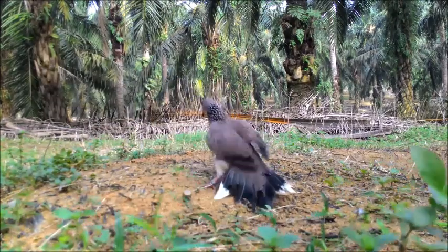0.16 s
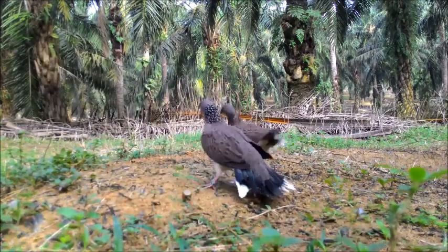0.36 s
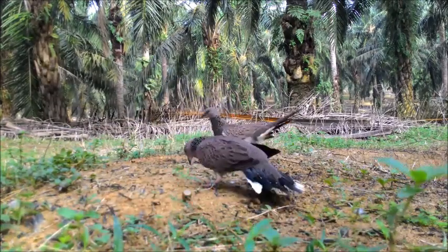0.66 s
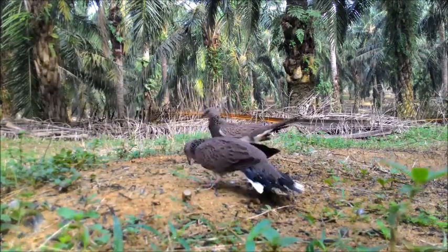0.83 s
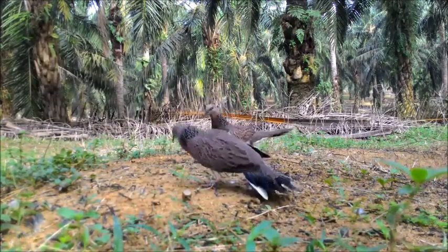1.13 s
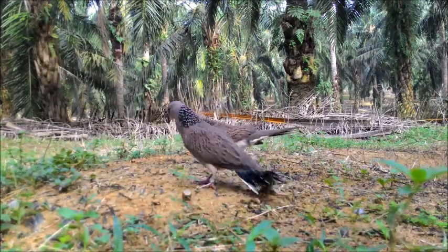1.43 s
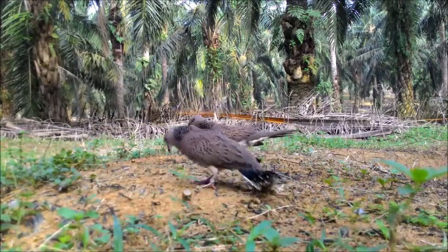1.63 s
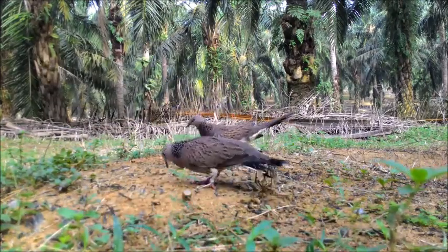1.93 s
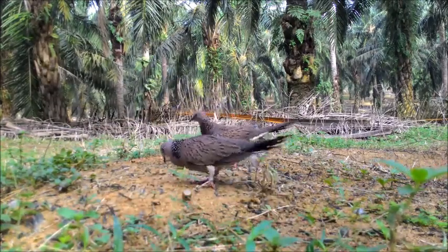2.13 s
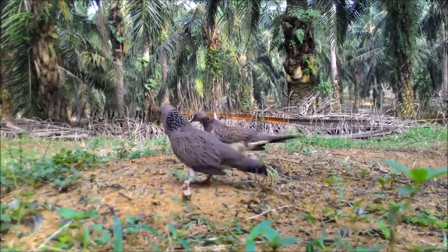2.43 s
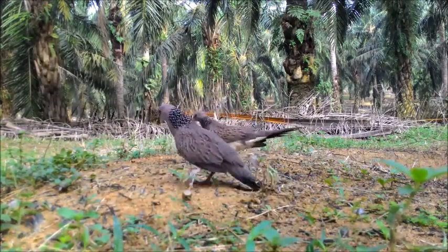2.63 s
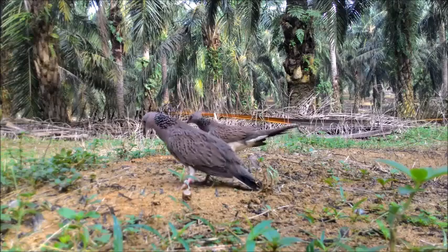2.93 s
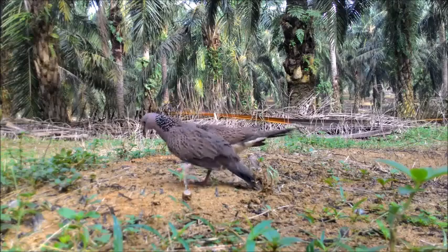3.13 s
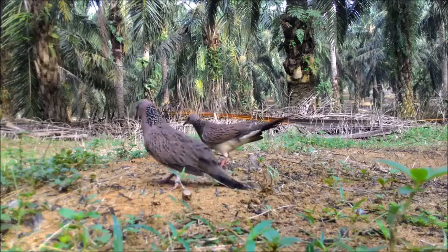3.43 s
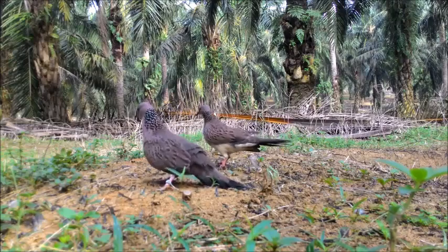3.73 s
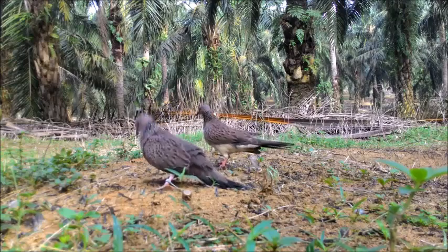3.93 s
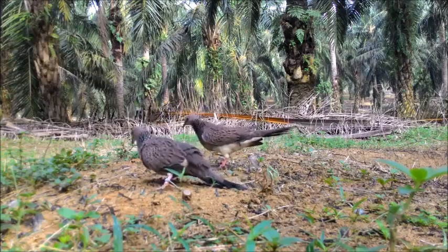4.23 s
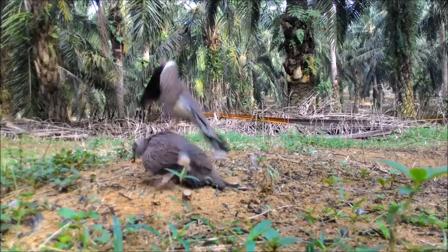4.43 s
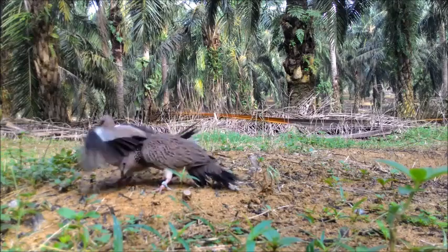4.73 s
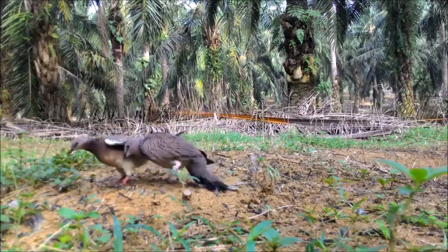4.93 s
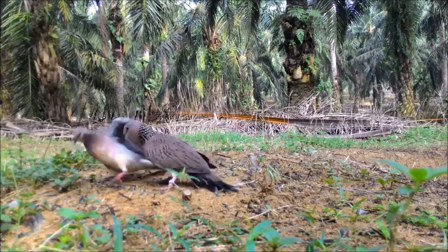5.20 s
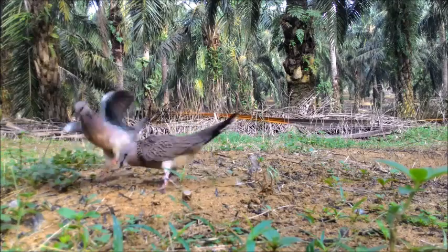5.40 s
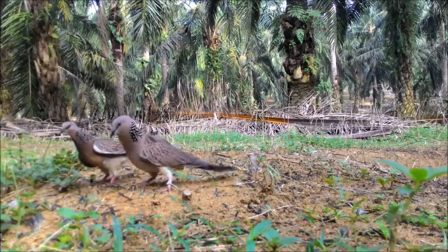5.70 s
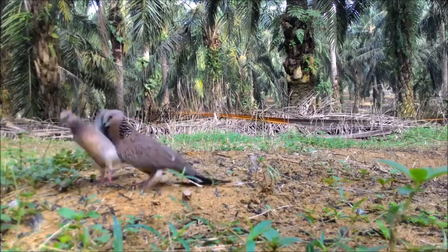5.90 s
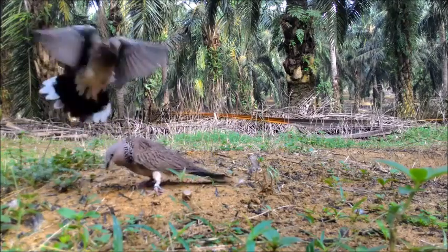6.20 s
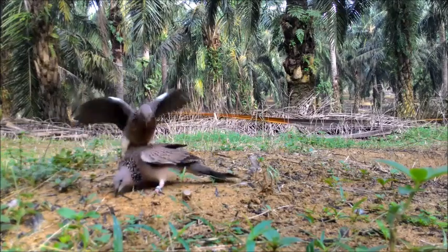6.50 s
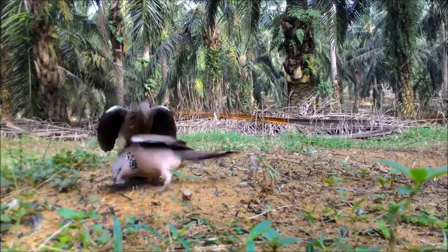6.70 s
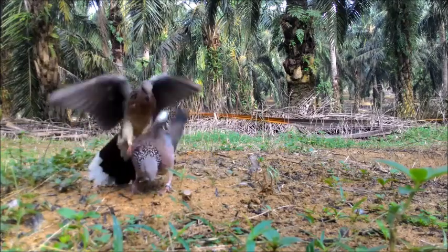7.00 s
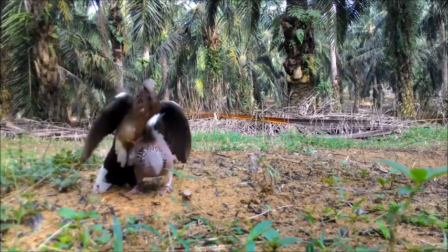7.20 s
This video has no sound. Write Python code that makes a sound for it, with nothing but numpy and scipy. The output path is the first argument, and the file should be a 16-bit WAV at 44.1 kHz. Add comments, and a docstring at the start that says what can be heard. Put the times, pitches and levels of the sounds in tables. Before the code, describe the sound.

Two doves fight on bare soil in a palm grove, very near a stereo microphone. Quick wing claps, rustling feathers and low puffs of air on the microphone open it, then two pairs of rough throbbing coos. A faint distant engine and soft bird pips fill the lull before lighter flaps, one violent double clap, a far rasping bird and scattered last slaps. A high cricket chorus pulses throughout.

```python
"""Two doves fight on bare soil in a palm grove, close to a two-port microphone; trunks return a short, dull echo.
First come wing claps, feather rustle and gusts of wing air on the membranes, then two pairs of throbbing coos.
A far engine follows, with soft bird pips; later a far bird rasps and more claps break out, one pair very loud.
Throughout, a cricket chorus pulses, louder at the start, over a lumpy breeze and capsule hiss.
Voices are beating sines, wings and air are shaped noise, motors and crickets are wavering tones."""
import sys
import numpy as np
from scipy import signal
from scipy.fft import rfft, irfft
from scipy.io import wavfile
from scipy.ndimage import uniform_filter1d

SR = 44100
rng = np.random.default_rng(int(sys.argv[2]) if len(sys.argv) > 2 else 0)


def wav_record(signal):
    """Record a signal, one row per channel, as 16-bit PCM in the file named by sys.argv[1]."""
    frames = np.transpose(np.atleast_2d(signal))
    bounded = np.clip(frames, -1, 1)
    # unit amplitude maps onto the largest positive 16-bit level
    quanta = np.round(bounded * 32767).astype(np.int16)
    wavfile.write(sys.argv[1], SR, quanta)


N = 324135
TIME = np.arange(N) / SR  # s


def amp(db):
    """Decibels to gain."""
    return 10 ** (np.asarray(db) / 20)


def unit(x):
    """Scaled to rms 1."""
    return x / np.sqrt(np.mean(x ** 2) + 1e-20)


def columns(rows):
    """Table columns drawn as curves over time, and a gate open along the table with soft ends."""
    s, *values = np.transpose(rows)
    gate = np.clip(np.minimum(TIME - s[0] + .004, s[-1] + .004 - TIME) / .012, 0, 1)
    return [np.interp(TIME, s, v) for v in values] + [gate]


def at_hz(points):
    """A spectrum of (f/Hz, level/dB) points as gain on the FFT grid."""
    hz, db = np.transpose(points)
    grid_hz = np.arange(N // 2 + 1) * SR / N
    return amp(np.interp(np.log(grid_hz + 1), np.log(hz), db))


def noise(points):
    """Noise of a given colour, rms 1."""
    white = rng.standard_normal(N)
    return unit(irfft(rfft(white) * at_hz(points), N))


def drift(rate_hz):
    """Slow random wander of spread 1."""
    return noise([(rate_hz, 0), (rate_hz * 10, -40), (rate_hz * 100, -120)])


def phase_of(hz):
    """Running phase in radians of a tone whose frequency may move."""
    return 2 * np.pi * np.cumsum(hz) / SR


def resonate(x, modes):
    """Parallel resonances (f/Hz, width/Hz, level/dB) of alternating sign."""
    out = 0
    for k, (hz, width_hz, db) in enumerate(modes):
        r = np.exp(-np.pi * width_hz / SR)
        poles = [1, -2 * r * np.cos(2 * np.pi * hz / SR), r * r]
        ringing = signal.lfilter([1 - r, 0, r - 1], poles, x + 1e-18)
        out = out + (-1) ** k * amp(db) * ringing
    return out


def bump(centre, half):
    """A bell-shaped swell; both arguments in seconds."""
    return np.exp(-.5 * ((TIME - centre) / half) ** 2)


# Dove voice close by, one table a note: [t/s, f/Hz, level/dB, roughness clipped to 0-1]
COO_NOTES = [
    [(.598, 408.6, -44.5, .8), (.612, 485.6, -32, .8), (.64, 667, -22, 0.9), (.68, 657, -21, 0.9),
     (.7, 613.3, -24.5, 0.7), (.72, 520.8, -28, .6), (.74, 462.7, -33, .7), (.754, 407.4, -53, .7)],
    [(.872, 547.7, -30.5, .9), (.885, 561.2, -28.5, 0.8), (.915, 678, -22.5, 1), (.935, 591, -22, .8),
     (.99, 635.8, -21.5, 0.8), (1.025, 566.4, -23.5, .6), (1.05, 658.7, -20, .5), (1.1, 634.6, -21, 0.3),
     (1.13, 608.3, -22.5, .05), (1.25, 569.8, -26, 0.3), (1.287, 385.3, -40.5, .4)],
    [(1.74, 432.9, -39.5, 1.1), (1.77, 586.7, -23, .9), (1.79, 669.4, -20, .8), (1.815, 630, -20, 0.9),
     (1.835, 542.7, -25.5, 0.6), (1.86, 522.4, -26.5, 0.7), (1.885, 483.6, -33.5, 0.2),
     (1.902, 393, -42, .5)],
    [(2.008, 488, -35.5, .7), (2.045, 637, -23, 0.9), (2.1, 686.5, -19.5, 0.6), (2.125, 633.7, -21.5, .9),
     (2.14, 586, -21.5, 0.1), (2.2, 645, -20.5, .25), (2.25, 632, -22, .05), (2.32, 600.7, -23, 0.1),
     (2.375, 542.2, -27.5, 0.3), (2.4, 443.8, -38.5, 0.4)],
]
# What else differs between notes: [beat gap as share of pitch, slower beat when rough/dB,
# third harmonic peak t/s, its level/dB, its half width/s]
COO_TRAITS = [(0.18, -12.5, .665, -68, .025), (.195, -10, .93, -69, 0.065), (0.18, -13.5, 1.79, -91, 0.035),
              (0.18, -5.5, 2.23, -81.5, .07)]
# Passband of the inflated neck: [f/Hz, level/dB]
NECK_COLOUR = [(250, -14.5), (380, -3.5), (880, 5.5), (1020, -7.5), (1180, -25.5), (1300, -41.5),
               (1500, -55)]
# Air noise in the neck: [f/Hz, relative level/dB per Hz]
BREATH_COLOUR = [(300, -25.5), (600, -5.5), (800, 0.5), (1120, -3), (1250, -32.5), (1800, -53.5)]
LADDER_DB, MIRROR_DB, OCTAVE_DB = -12, -8, -12.5  # step of upper side lines, lower side line, second harmonic
FAST_SMOOTH_DB, FAST_ROUGH_DB, SLOW_SMOOTH_DB = -23.5, -5.5, -22.5  # side lines of the two beats
SLOW_BEAT_SHARE = 0.58  # the slower beat rate, as share of the gap
BREATH_ROUGH = .09  # breath added at full roughness
BREATH_PER_DB, FULL_VOICE_DB = 0.0264, -24  # breath also grows as the voice weakens below this level
AIR_DB = -11  # gain of the air noise on the breath
SWING_LIMIT = .65  # how far the membrane flattens loud beats, 0-1


def coos():
    """A near-sine voice; a second membrane adds ladders of side lines, so the level throbs at two rates."""
    rows = [(*row, row[1] * traits[0], traits[1])
            for note, traits in zip(COO_NOTES, COO_TRAITS) for row in note]
    pitch, level_db, rough, gap, slow_rough_db, _ = columns(rows)
    rough = np.clip(rough, 0, 1)
    weakness_db = np.clip(FULL_VOICE_DB - level_db, 0, 20)
    breath = BREATH_ROUGH * rough + BREATH_PER_DB * weakness_db

    beat = 1 + breath * (drift(80) + 1j * drift(90))
    rates = ((gap, FAST_SMOOTH_DB, FAST_ROUGH_DB),
             (SLOW_BEAT_SHARE * gap, SLOW_SMOOTH_DB, slow_rough_db))
    for hz, smooth_db, rough_db in rates:
        turn = np.exp(1j * phase_of(hz * (1 + .05 * drift(30))))
        side_db = smooth_db + rough * (rough_db - smooth_db)
        upper = turn / (1 - amp(LADDER_DB) * turn)  # an endless ladder of lines
        beat = beat + amp(side_db) * (upper + amp(MIRROR_DB) / turn)
    beat = beat / (1 + np.abs(beat) ** 2) ** (.5 * SWING_LIMIT)  # the swing saturates
    beat = beat / np.sqrt(uniform_filter1d(np.abs(beat) ** 2, size=1000) / 2)  # even level

    air = amp(AIR_DB) * (breath + 0.025) * noise(BREATH_COLOUR) * np.abs(beat)
    shaky = np.exp(.8j * drift(60))  # the third harmonic is unsteady
    gate = sum(columns(note)[-1] for note in COO_NOTES)
    third_gain = sum(amp(db) * bump(s, half) for *_, s, db, half in COO_TRAITS)
    carrier = np.exp(1j * phase_of(pitch))
    voiced = np.real(beat * carrier + amp(OCTAVE_DB) * beat ** 2 * carrier ** 2)
    low = gate * amp(level_db) * voiced
    third = third_gain * np.real(beat * shaky * carrier ** 3)
    return irfft(rfft(low) * at_hz(NECK_COLOUR), N) + gate * (third + amp(level_db) * air)


# Wing claps close by, before a shared 0.5 dB lift:
# [t/s, thud level/dB, thud f/Hz, quill snap level/dB, length/s]
WING_CLAPS = [(.013, -30.5, 1050, -30, 0.006), (0.04, -24, 530, -35.5, 0.016),
              (0.092, -24, 810, -27.5, 0.0085), (0.121, -22, 971.6, -38, 0.0083),
              (4.546, -51.5, 594, -49, 0.0093), (4.569, -41.5, 492.7, -55, 0.0034),
              (5.4151, -11, 800, -21.5, 0.005), (5.4208, -24.5, 990, -14, 0.0014),
              (6.099, -45, 840, -60, 0.016), (6.119, -26.5, 823, -47.5, 0.0048),
              (6.123, -28, 610, -39.5, 0.0076), (6.41, -60, 650, -73, 0.029),
              (6.571, -54.5, 622, -64, .005), (7.094, -39, 903, -44.5, 0.0062),
              (7.104, -26.5, 1620, -31.5, 0.0062), (7.108, -35.5, 522, -50, 0.013)]
# Lone quill ticks, before the same lift: [t/s, level/dB]
QUILL_TICKS = [(.008, -23), (.018, -31), (.137, -30.5), (.335, -38), (.437, -56), (0.454, -52),
               (4.528, -57.5), (4.614, -49)]
# Push of air under every thud: [f/Hz, width/Hz, level/dB]
AIR_PUSH = [(170, 260, -3)]
# Quill resonances: [f/Hz, width/Hz, level/dB]
QUILLS = [(1690, 600, -12.5), (4740, 2200, -6), (7360, 1200, -2), (10800, 1700, -19.5)]
TICK_S, TICK_THUD_DB, TICK_HZ = 0.0016, -19.5, 1023  # length, thud against tick, thud pitch
THUD_CUT = 1.8  # soft vanes cut the thud above this multiple of its pitch


def claps():
    """Each clap is a brief burst of air noise in the hollow between the wings and in the quill resonances."""
    out = np.zeros(N)
    age = np.arange(-600, 1400) / SR
    ticks = [(s, db + TICK_THUD_DB, TICK_HZ, db, TICK_S) for s, db in QUILL_TICKS]
    for s, thud_db, hz, snap_db, length in WING_CLAPS + ticks:
        envelope = np.exp(-.5 * (age / length * 2.0) ** 2)
        burst = envelope * rng.choice([-1, 1], (2, len(age)))
        thud = resonate(burst[0], AIR_PUSH + [(hz, hz * 0.39, 0)])
        thud = signal.lfilter(*signal.butter(2, THUD_CUT * hz, fs=SR), thud)
        snap = resonate(np.convolve(burst[1], [1, 2, 1], "same"), QUILLS)
        clap = amp(thud_db) * thud / np.max(np.abs(thud))
        clap = clap + amp(snap_db) * snap / np.max(np.abs(snap))
        at = round(s * SR) - 600 + np.arange(len(age))
        out[at[at >= 0]] += amp(0.5) * clap[at >= 0]
    return out


# Wing strokes close by, at their fastest: [t/s, swish level/dB, rustle level/dB]
WING_STROKES = [(.01, -66, -47.5), (0.041, -29.5, -40), (.075, -41, -45.5), (.125, -52.5, -51),
                (4.53, -64, -62), (4.552, -51, -54.5), (4.62, -70, -76), (5.401, -44.5, -61),
                (5.429, -50.5, -48.5), (5.48, -67, -57), (5.6, -55.5, -60.5), (6.095, -59.5, -67),
                (6.131, -44.5, -52.5), (6.41, -58.5, -71), (6.569, -64.5, -77), (7.09, -65.5, -65.5),
                (7.116, -47.5, -48.5), (7.34, -67, -85)]
# Dull brush of the vanes: [f/Hz, relative level/dB per Hz]
VANE_SWISH = [(120, 16), (250, 9), (700, 3), (1200, 0.5), (1800, -53.5)]
# Grainy feather rustle: [f/Hz, relative level/dB per Hz]
VANE_RUSTLE = [(1200, -8.5), (1700, -8), (2500, -13), (3500, -8), (5000, -6), (8500, -15), (11000, -22.5),
               (15500, -39.5)]
STROKE_RISE_DB_PER_S, STROKE_FALL_DB_PER_S = 600, 400
TAIL_DB, TAIL_DB_PER_S = -8, 97  # the grove's echo trails slowly after each stroke


def feathers():
    """Vanes brushing: a dull swish and a grainy rustle swell with each stroke, drop, and trail off in the
    grove's echo."""
    swish = noise(VANE_SWISH) * amp(3 * drift(60))
    rustle = noise(VANE_RUSTLE) * amp(3 * drift(150))
    swish_power, rustle_power = np.zeros((2, N))
    for s, swish_db, rustle_db in WING_STROKES:
        near = slice(max(0, round((s - .2) * SR)), round((s + .6) * SR))
        age = TIME[near] - s
        tail_db = TAIL_DB - TAIL_DB_PER_S * age
        fall_db = np.maximum(-STROKE_FALL_DB_PER_S * age, tail_db)
        stroke_power = amp(np.minimum(STROKE_RISE_DB_PER_S * age, fall_db)) ** 2
        swish_power[near] += amp(swish_db) ** 2 * stroke_power
        rustle_power[near] += amp(rustle_db) ** 2 * stroke_power
    return np.sqrt(swish_power) * swish + np.sqrt(rustle_power) * rustle


# Puffs of wing air at the microphone: [t/s, peak level/dB before softening, f/Hz]
WING_PUFFS = [(.042, -24, 61.4), (.09, -30, 76), (.133, -33.5, 44), (.225, -37, 51.4), (.281, -40, 70.5),
              (.365, -10, 145.8), (.375, -10.5, 101), (.391, -22, 96.6), (.413, -8.5, 115),
              (.438, -13, 115.7), (.453, -23.5, 171), (.465, -18.5, 101.2), (.58, -33, 71.3),
              (.809, -47.5, 40), (.9, -38, 54)]
# Breeze at the microphone: [t/s, level/dB before a 1.5 dB cut and the lumps]
BREEZE = [(0.0, -52.5), (0.49, -43.5), (0.63, -54), (1.7, -67), (2.9, -57.5), (3.66, -54.5), (4.05, -63.5),
          (4.54, -51), (5.2, -64), (5.49, -55.5), (6.1, -71), (6.3, -56.5), (7.35, -49.5)]
# Its rumble: [f/Hz, relative level/dB per Hz]
BREEZE_COLOUR = [(15, -13.5), (35, 1.5), (60, 13), (110, 4), (200, -43.5)]
PUFF_CYCLES = 6.5  # each puff dies away by 60 dB within so many cycles
EDDY_SHARE, STRONG_PUFF_DB = 0.34, -15.5  # eddies on a strong puff; weaker puffs carry fewer


def gusts():
    """Wing air pushes the membrane in soft lumps, each with its eddies, over a lumpy breeze."""
    out = np.zeros(N)
    age = np.arange(6000) / SR
    eddies = noise([(100, -8.0), (250, -2), (500, -24.5), (800, -38)])
    for k, (s, db, hz) in enumerate(WING_PUFFS):
        start = round(s * SR)
        at = slice(start, start + len(age))
        shape = amp(-60 * age * hz / PUFF_CYCLES) * (1 - np.exp(-(age / 0.0063) ** 2))
        eddy_gain = EDDY_SHARE * amp(min(db - STRONG_PUFF_DB, 0) / 2)
        lump = np.sin(2 * np.pi * hz * age) + eddy_gain * eddies[at]
        out[at] += (-1) ** k * amp(db) * lump * shape / np.max(shape)
    soft = signal.sosfilt(signal.butter(4, 550, fs=SR, output="sos"), out)
    breeze_db = columns(BREEZE)[0] - 1.5 + 2.0 * drift(13.0)
    return soft + amp(breeze_db) * noise(BREEZE_COLOUR)


ECHO_T60_S, ECHO_CUT_HZ = 0.6, 1300


def trunks(x):
    """Scattered echoes from the trees: a dull, dying noise response."""
    age = np.arange(SR // 2) / SR
    onset = np.clip(age / 0.033, 0, 1)
    tail = rng.standard_normal(len(age)) * amp(-60 * age / ECHO_T60_S) * onset
    tail = signal.lfilter(*signal.butter(1, ECHO_CUT_HZ, fs=SR), tail)
    return signal.fftconvolve(x, tail / np.sqrt(np.sum(tail ** 2)))[:N]


# Wing strokes in one chirp of the nearest cricket: [t/s, level/dB]
CHIRP_STROKES = [(.011, -22), (.0257, -5), (.0403, 0), (.055, 0)]
# How early its chirps run: [t/s, lead/s]
CHIRP_LEAD = [(.25, 0), (1.75, .004), (3.25, .012), (4.25, .0065), (5.75, .003)]
# Its wing tones: [f/Hz, waver/Hz, rms level/dB once the chorus has settled, blur 0-1]
WING_TONES = [(6790, 65, -58, 0), (13500, 300, -86.5, 0.5)]
CHIRP_S, STROKE_HALF_S = 1 / 17.05, .0026  # chirp period, stroke half width


def cricket():
    """Uneven strokes, the first faint, make a chirp on a wavering wing tone; distance blurs the overtone."""
    age = (TIME + columns(CHIRP_LEAD)[0]) % CHIRP_S
    strokes = 0
    for s, db in CHIRP_STROKES:
        offset = (age - s + CHIRP_S / 2) % CHIRP_S - CHIRP_S / 2  # wraps round the chirp
        strokes = strokes + amp(db) * np.exp(-.5 * (offset / STROKE_HALF_S) ** 2)
    strokes = strokes * amp(1.5 * drift(25))
    out = 0
    for hz, waver_hz, db, blur in WING_TONES:
        tone = np.sin(phase_of(hz + waver_hz * drift(120)))
        out = out + amp(db) * unit((strokes + blur) * tone)
    return out


# Chorus and air of the grove all round: [f/Hz, relative level/dB per Hz]
GROVE_COLOUR = [(100, -13), (184, -4.5), (300, -19.5), (670, -21), (1010, -29), (1240, -28.5),
                (2150, -31.5), (3310, -32), (5410, -34.5), (6100, -17), (6770, -0.5), (7350, -14.5),
                (7980, -30), (9500, -36.5), (16000, -40)]
GROVE_DB = -58  # once settled
CHORUS_OPENING_DB, CHORUS_OPENING_S = 6, .2  # the insects are louder at first, then settle


def diffuse():
    """All that arrives from no one place, insects and feathers; each call is a new draw."""
    insects = amp(GROVE_DB + 1.0 * drift(9.1)) * noise(GROVE_COLOUR) + cricket()
    opening = amp(CHORUS_OPENING_DB * np.exp(-TIME / CHORUS_OPENING_S))
    return opening * insects + feathers()


# Far bird pips: [onset t/s, peak level/dB, middle f/Hz]
BIRD_PIPS = [(2.61, -52.5, 976), (2.67, -66, 1275), (2.706, -59.5, 1232), (2.743, -63, 1147),
             (2.807, -58, 940), (2.873, -64.5, 928), (2.974, -68, 974), (5.352, -65, 988),
             (5.556, -63, 945), (5.593, -60, 856), (5.721, -63.5, 881)]
# Body of a far bird's rasp: [f/Hz, width/Hz, level/dB]
RASP_BODY = [(2600, 400, 6), (3000, 400, 10), (3650, 80, 15)]
# Thin hiss near 3.3 kHz: [t/s, level/dB]
HISS_SWELLS = [(1.848, -78), (3.65, -84), (5.0, -82), (6.349, -79.5)]
PIP_S, PIP_SAG_HZ_PER_S = 0.02, 520
RASP_FIRST_S, RASP_EVERY_S, RASP_DB = 5.265, .305, -75.5  # it rasps six times
RASP_ATTACK_S, RASP_PEAK_S, RASP_HALF_S = .01, .03, .055
SWELL_HALF_S = 0.11


def far_calls():
    """Soft sagging bird pips, a rasping bird and thin swells of hiss, the last two as resonant noise."""
    out = np.zeros(N)
    waver = 1.2 * drift(40)
    for s, db, hz in BIRD_PIPS:
        middle = s + PIP_S / 2
        age = TIME - middle
        phase = 2 * np.pi * (hz - PIP_SAG_HZ_PER_S * age / 2) * age
        out += amp(db) * bump(middle, PIP_S / 3) * np.sin(phase + waver)
    rasp = 0
    for s in RASP_FIRST_S + RASP_EVERY_S * np.arange(6):
        attack = np.clip((TIME - s) / RASP_ATTACK_S, 0, 1)
        rasp = rasp + amp(RASP_DB) * attack * bump(s + RASP_PEAK_S, RASP_HALF_S)
    swell = sum(amp(db) * bump(s, SWELL_HALF_S) for s, db in HISS_SWELLS)
    white = rng.standard_normal((2, N))
    out += rasp * unit(resonate(white[0], RASP_BODY))
    return out + swell * unit(resonate(white[1], [(3330, 84, 0)]))


# Engine on a distant road, one table a gear: [t/s, firing f/Hz, level/dB before a 4 dB lift]
ENGINE_GEARS = [
    [(1.9, 43.77, -67.5), (2.42, 56.48, -53.5), (3.06, 65.2, -51), (3.28, 66.15, -57.5), (3.71, 69.95, -47),
     (4.05, 71, -67.5), (4.35, 67.2, -50.5), (4.95, 55.62, -65.5), (5.35, 53.43, -54), (6.0, 43.7, -62)],
    [(6.12, 49.5, -52), (6.53, 50.94, -51), (7.05, 55.76, -59), (7.35, 52.5, -53.5)],
]
# Second order in each gear: [level/dB before a 9.5 dB lift]
SECOND_ORDER = [-85.5, -66]
# A far motor hum: [t/s, f/Hz, level/dB before a 0.5 dB cut and the wander]
MOTOR_HUM = [(.6, 169, -60), (1.04, 172.9, -66.5), (1.37, 170, -56), (2, 176.3, -73), (2.42, 177.4, -62.5),
             (3.4, 175.1, -65.5), (3.9, 186, -74), (5.3, 188.1, -79)]


def motors():
    """Low wavering tones from a distance: an engine's firing rate with its octave, and a hum."""
    out = np.zeros(N)
    for gear, octave_db in zip(ENGINE_GEARS, SECOND_ORDER):
        hz, db, gate = columns(gear)
        phase = phase_of(hz * (1 + 0.0041 * drift(15)))
        firing = amp(db + 4.0) * np.sin(phase)
        out += gate * (firing + amp(octave_db + 9.5) * np.sin(2 * phase))
    hz, db, gate = columns(MOTOR_HUM)
    hum = np.sin(phase_of(hz * (1 + 0.035 * drift(2.7))))
    return out + gate * amp(db - 0.5 + 0.96 * drift(12)) * hum


# Trunks return the coo's upper part better: [f/Hz, level/dB]
COO_ECHO_COLOUR = [(400, -8), (620, -16), (800, -4), (1050, 9), (1400, 16)]
# Stereo width, the bass narrowed: [f/Hz, side level/dB before the two side gains]
PORT_WIDTH = [(60, -63), (110, -51), (200, -45), (380, -29.5), (700, -24.5), (1290, -20.5), (2380, -23.5),
              (4400, -7), (8120, -3.5), (15000, 6)]
COO_ECHO_DB, CLAP_ECHO_DB, FAR_ECHO_DB = -35, -39, -14  # sent to the trunks


def scene():
    """Side is the mid a quarter turn late, as from spaced ports, right first, plus a new diffuse draw."""
    voice, wings, far = coos(), claps(), far_calls()
    echoed = amp(COO_ECHO_DB) * irfft(rfft(voice) * at_hz(COO_ECHO_COLOUR), N)
    echoed = echoed + amp(CLAP_ECHO_DB) * wings + amp(FAR_ECHO_DB) * far
    mid = voice + wings + far + trunks(echoed) + gusts() + motors() + diffuse()
    side_spectrum = amp(-8) * rfft(diffuse()) - amp(-3.0) * 1j * rfft(mid)
    side = irfft(side_spectrum * at_hz(PORT_WIDTH), N)
    return np.array([mid + side, mid - side])


# Hiss of each capsule: [f/Hz, relative level/dB per Hz]
CAPSULE_HISS = [(3000, -30.5), (8000, -8), (12000, -1), (16000, 1)]
CAPSULE_HISS_DB, BASS_CUT_HZ, TOP_CUT_HZ = -82.5, 26, 15750  # hiss before the cuts


def record(dry):
    """The microphone: separate hiss in each capsule, a bass cut and a steep top cut."""
    hiss = amp(CAPSULE_HISS_DB) * np.array([noise(CAPSULE_HISS), noise(CAPSULE_HISS)])
    bass_cut = signal.butter(2, BASS_CUT_HZ, "high", fs=SR, output="sos")
    top_cut = signal.ellip(12, .5, 70, TOP_CUT_HZ, fs=SR, output="sos")
    return signal.sosfilt(top_cut, signal.sosfilt(bass_cut, dry + hiss))


dry = scene()
out = record(dry)
wav_record(out)
```